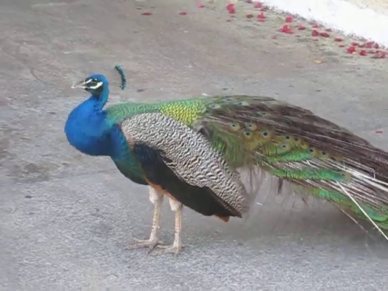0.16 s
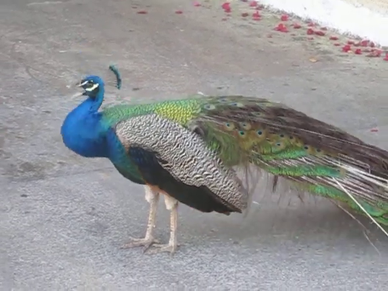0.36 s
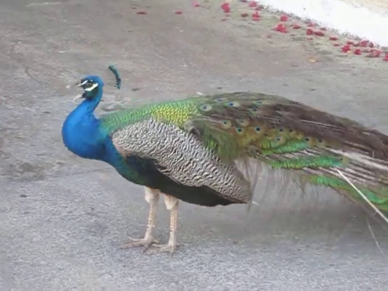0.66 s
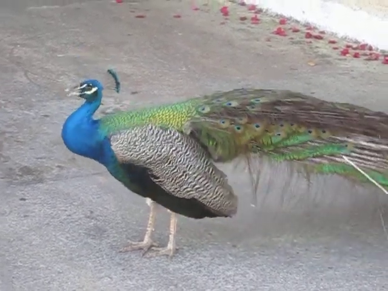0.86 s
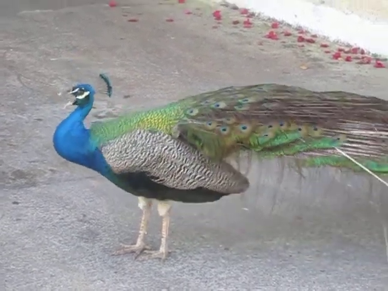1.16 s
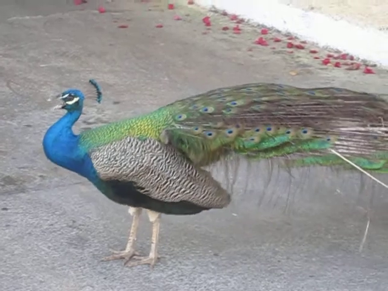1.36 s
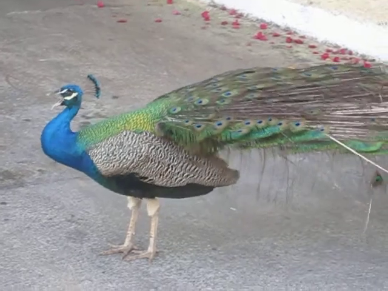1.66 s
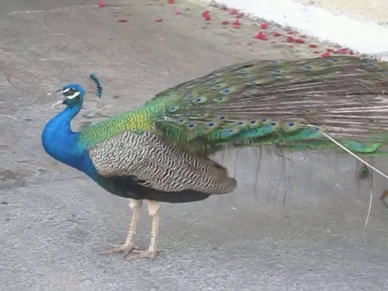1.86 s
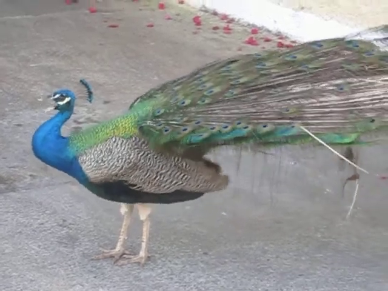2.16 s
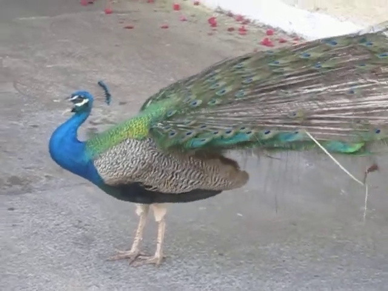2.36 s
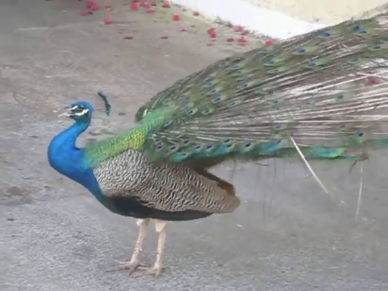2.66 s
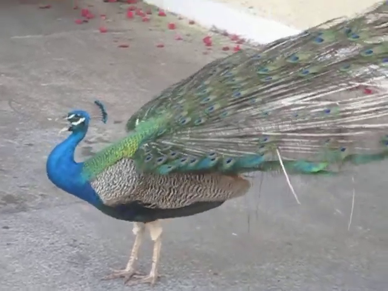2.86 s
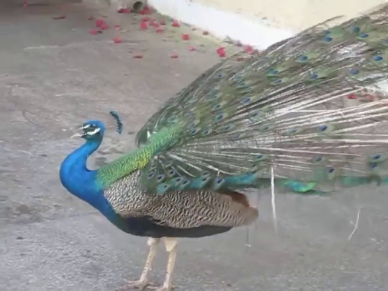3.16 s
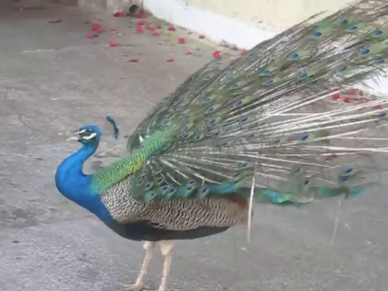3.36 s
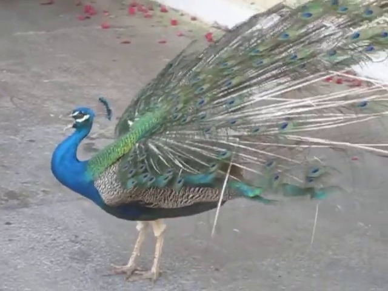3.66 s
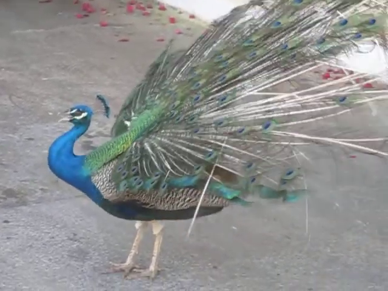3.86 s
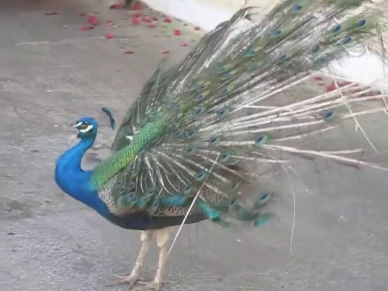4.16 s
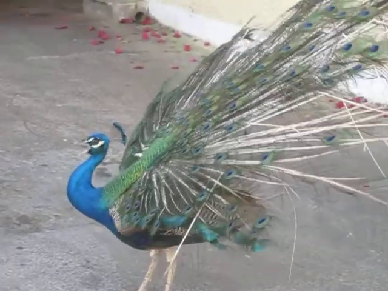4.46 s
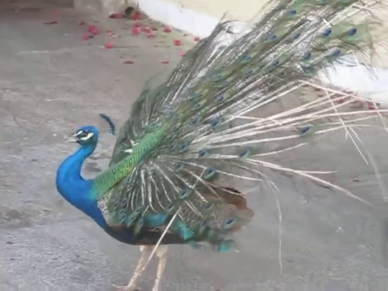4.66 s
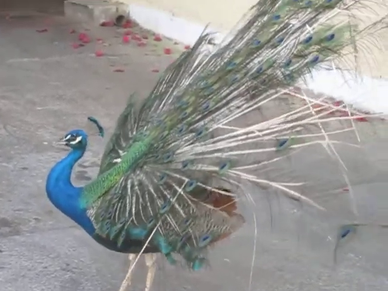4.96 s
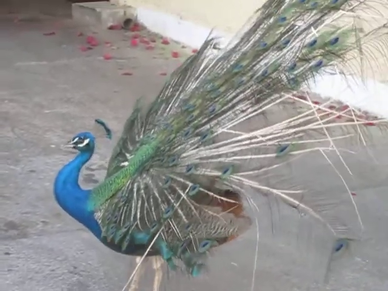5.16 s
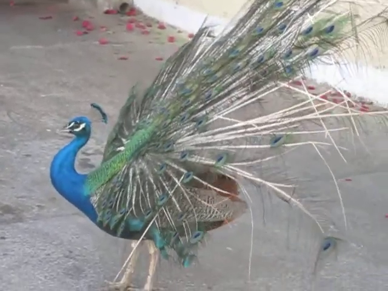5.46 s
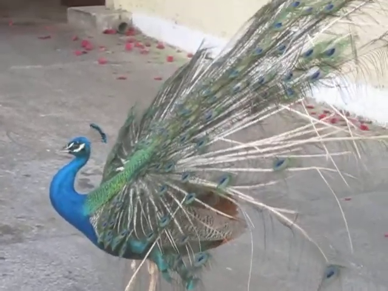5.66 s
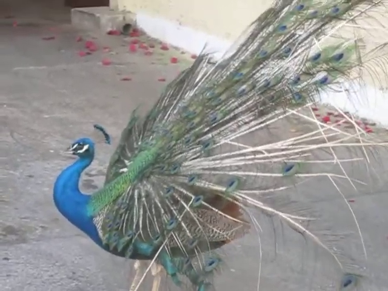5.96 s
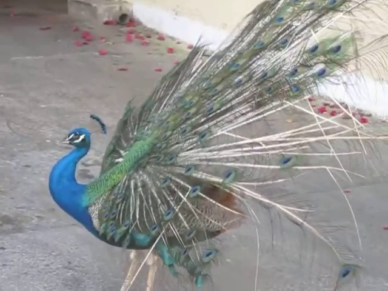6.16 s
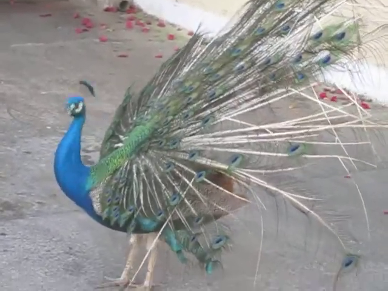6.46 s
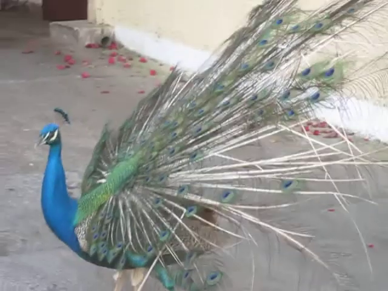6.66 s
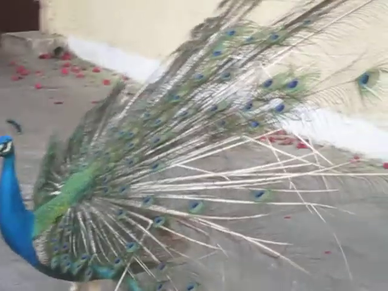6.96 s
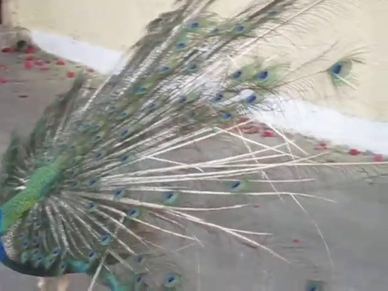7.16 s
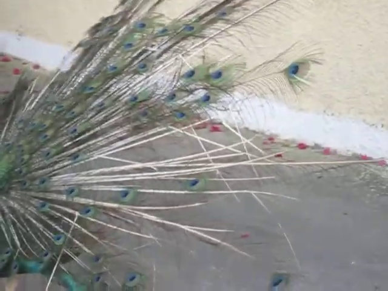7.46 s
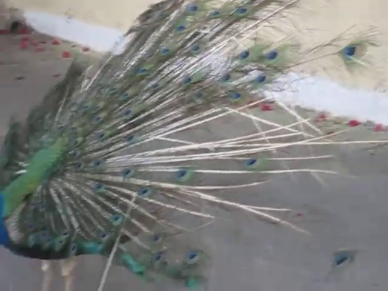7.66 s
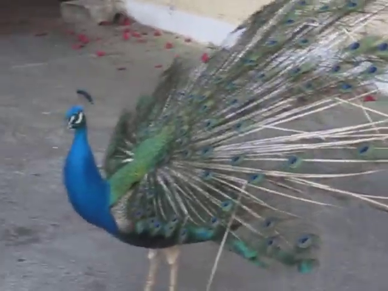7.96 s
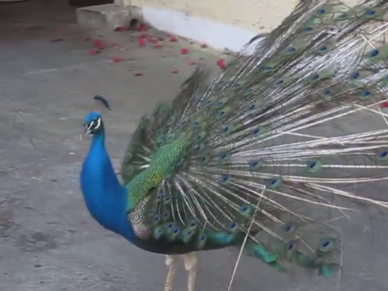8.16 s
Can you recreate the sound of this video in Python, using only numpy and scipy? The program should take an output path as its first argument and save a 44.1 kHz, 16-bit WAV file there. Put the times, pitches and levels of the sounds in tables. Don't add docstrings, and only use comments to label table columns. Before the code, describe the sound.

Seven loud peafowl calls ring off yard walls over faint traffic and hum, followed by quiet claws on paving, breeze and a distant peafowl's reply.

```python
import sys
import numpy as np
from scipy import signal
from scipy.fft import rfft, irfft, next_fast_len
from scipy.io import wavfile
from scipy.ndimage import uniform_filter1d, map_coordinates

SR = 44100
rng = np.random.default_rng(int(sys.argv[2]) if len(sys.argv) > 2 else 0)


def gain_from_db(level_db):
    decades = np.asarray(level_db, float) / 20
    return 10 ** decades


def put_to_file(sound):
    columns = np.atleast_2d(sound).T
    safe = np.clip(columns, -1, 1)
    whole_steps = np.round(safe * 32767)
    wavfile.write(sys.argv[1], SR, whole_steps.astype(np.int16))


N = 365883

# [t/s, length/s, top f/Hz, rise/s, low f/Hz]
CALLS = [
    (0.309, 0.49, 842, 0.25, 678.6),
    (1.009, 0.34, 814, 0.17, 668.6),
    (1.546, 0.33, 800, 0.16, 659),
    (2.098, 0.39, 790.5, 0.18, 654),
    (2.706, 0.398, 782.1, 0.193, 648.2),
    (3.36, 0.43, 778.6, 0.2, 640.5),
    (4.079, 0.47, 773.5, 0.21, 637.6),
]
# [t/s, length/s, top f/Hz, rise/s, low f/Hz]
CLUCK_ARC = (0.019, 0.0124, 775, 0.0034, 700)
# [f/Hz, level/dB]
THROAT_RESONANCE = [(500, -21.5), (800, 5.5), (1500, -2), (2100, 7.5), (2900, 8.5), (3700, 0.5),
                    (4400, -9.5), (5900, -7), (7000, -7), (8500, -22), (11500, -14.5), (13200, -23.5),
                    (15500, -40)]
# [f/Hz, width/Hz, level/dB]
PAVING_DIPS = [(1374, 15, -19), (1518, 19, -11), (2090, 20, -27)]
# [f/Hz, t60/s]
YARD_DECAY = [(500, 1.2), (1400, 0.88), (2000, 0.96), (2330, 1), (2800, 0.86), (5000, 0.64), (10000, 0.62),
              (15000, 0.63)]
# [f/Hz, level/dB]
YARD_TONE = [(400, 11), (800, -4.5), (1300, 1), (1600, 3), (2000, -5.5), (2350, 2.5), (3000, -2), (5000, 7),
             (6400, -1.5), (9000, 8.5), (12000, -5.5), (15000, -5.5)]
# [t/s, level/dB]
WALL_ARRIVALS = [(0, 2), (.008, 4), (.04, -9.5), (.065, 3), (.09, -0.5), (.13, -2), (.2, -3)]
# [t/s, length/s, f/Hz, level/dB, second partial level/dB]
FAR_PEAFOWL = [
    (7.72, 0.12, 845, -48.5, 1.5),
    (7.71, 0.17, 790, -51, -4),
    (7.955, 0.091, 940, -45, -11),
    (8.095, 0.27, 800, -47, -8.5),
    (8.18, .15, 925, -45, -10.5),
]
# [t/s, length/s, from f/Hz, to f/Hz, level/dB]
SMALL_BIRDS = [(.0, 0.028, 4850, 4330, -55), (.14, 0.13, 3500, 2960, -59.5), (5.73, .06, 3500, 3150, -61),
               (5.95, 0.049, 3550, 3110, -57), (6.14, 0.055, 3590, 3150, -55),
               (6.33, 0.056, 3600, 3350, -63), (7.02, 0.067, 1760, 1750, -61),
               (7.11, 0.054, 2110, 2060, -55.5), (6.47, 0.043, 2380, 2200, -59),
               (6.801, 0.12, 3370, 3100, -67), (7.217, 0.072, 1790, 1750, -60),
               (7.224, 0.065, 591, 575, -49), (7.375, 0.051, 4160, 4120, -59),
               (7.47, 0.074, 4120, 4120, -73), (7.85, 0.033, 5200, 4900, -64), (8.04, .04, 4900, 4700, -68),
               (8.15, 0.035, 2680, 3620, -67), (8.21, 0.039, 5130, 4640, -59)]
# [t/s, peak level/dB, low ring level/dB, crack
# level/dB]
CLAW_TICKS = [
    (0.0257, -47, -4, 6.5),
    (5.0436, -25.5, -5, -24),
    (5.3991, -49, 11, -10),
    (6.5671, -40, -10, -14),
    (6.5846, -23.5, -0.5, -18.5),
    (6.6649, -25, -0.5, -23),
    (7.4094, -51, -9, -5),
    (7.785, -50, -4, -9),
    (7.8545, -49, -4, -15),
]
# [t/s, peak level/dB, f/Hz]
WIND_PUSHES = [
    (7.125, -34, 99.6),
    (7.174, -34, 59.2),
    (7.215, -30.5, 116),
    (7.327, -30, 118),
    (7.359, -29, 113),
    (7.429, -32, 160),
    (7.584, -32, 75.4),
    (7.639, -31, 86.1),
    (7.899, -35, 61.3),
    (8.28, -40, 50),
]
# [f/Hz, level/dB per Hz]
WIND_RUMBLE = [(12, -52), (20, -7), (54, 1), (118, -7), (157, -14), (234, -12), (260, -26), (340, -49),
               (570, -120)]
# [f/Hz, level/dB]
MACHINE_HUM = [(59.2, -61.5), (349.9, -56), (527.6, -54.5), (1061, -62.5)]
# [f/Hz, level/dB per Hz]
FAR_AIR = [(15, -52), (25, -20), (59, -12), (309, -10.5), (344, -10), (488, -9.5), (529, -12), (729, -12.5),
           (1090, -15.5), (1540, -20), (3260, -25.5), (4260, -29), (7890, -33), (15000, -42.5)]

# [effort level/dB, brightness/dB per octave, first partial level/dB, second partial level/dB, beak ring level/dB]
CALL_VOICE, CLUCK_VOICE = (1.56, 2.48, 1.51, 0.55, 3.5), (-0.5, -11, 3.5, 6.5, -24)
LONGER, USUAL_S = (-11, 4, 20, 21, -2), 0.4
AT_OPENING, OPENING_S = (-5.5, -6.5, -6.5, 8.5, -2), 0.031
AT_CREST, CREST_SHARE = (2.5, 0, -1.5, -10, 1.5), 0.082
AT_CLOSING, SHUT_S = (-6, 0, -2.5, 8, -4.5), 0.032
CLOSING_S = 0.014
TOP_HZ = 15800


def peafowl():
    calls = [(CLUCK_ARC, CLUCK_VOICE, -19)]
    for row in CALLS:
        calls.append((row, CALL_VOICE + np.multiply(LONGER, row[1] - USUAL_S), -9))
    out = np.zeros(N)
    for row, voice, rasp_db in calls:
        start, direct, radiated = call(row, voice, rasp_db)
        add(out, start, gain_from_db(-1.87) * direct)
        add(out, start, yard(radiated, wet_db=-4.0, longer=1.066))
    return out


def call(row, voice, rasp_db):
    s, length, top_hz, rise_s, _ = row
    t = np.arange(round((length + CLOSING_S) * SR)) / SR
    k = np.arange(1, 25)[:, None]
    done = t / t[-1]
    crest = np.exp(-((t - rise_s) / (CREST_SHARE * length)) ** 2)
    voice_now = np.outer(voice, np.ones(len(t))) + np.outer(AT_CREST, crest)
    voice_now += np.outer(AT_OPENING, np.exp(-t / OPENING_S))
    voice_now += np.outer(AT_CLOSING, np.exp((t - t[-1]) / SHUT_S))
    extra_db, tilt_db, first_db, second_db, beak_db = voice_now

    shaky = 0.00061 + 0.017 * np.exp(-t / 0.016)
    hz = k * arc(t, *row[1:]) * (1 + shaky * wobble(249, len(t)))
    turn = np.exp(2j * np.pi * np.cumsum(hz, axis=1) / SR + 0.35j * k ** 2)

    third_db = 5.5 * crest + 3 * np.exp(-t / 0.042)
    level_db = along(THROAT_RESONANCE, hz) + tilt_db * np.log2(hz / 1400)
    level_db += first_db * (k == 1) + second_db * (k == 2) + third_db * (k == 3)
    level_db += beak_db * np.exp(-((hz - 3050) / 450) ** 2) - 200 * (hz > TOP_HZ)
    level_db -= 11 * done ** 1.62 * np.exp(-((hz - 6000) / 2700) ** 2)
    level_db -= 10 * (1 - np.sin(np.pi * done ** 0.93)) / (1 + (10500 / hz) ** 6)
    level = gain_from_db(level_db) / np.linalg.norm(gain_from_db(level_db), axis=0)

    spacing_hz = 1188.2 - 0.0206 * hz - 25.1 * crest + 0.2 * (top_hz - 800)
    path = 1 - 0.95 * np.exp(-hz / 40000) * np.exp(-2j * np.pi * hz / spacing_hz)
    dips_db = sum(db * np.exp(-((hz - dip_hz) / width) ** 2) for dip_hz, width, db in PAVING_DIPS)
    turning_db = 3.64 * (k > 4) * np.array([wobble(15.5, len(t)) for _ in k])
    head_up_db = 16 * crest * np.exp(-((hz - 3100) / 440) ** 2)
    path = path * gain_from_db(dips_db) * gain_from_db(turning_db - head_up_db)

    breath = gain_from_db(rasp_db - 60 * t / 0.096) + gain_from_db(rasp_db - 27)
    rasp = breath * noise(THROAT_RESONANCE)[:len(t)]
    effort_db = -3 - 9 * np.exp(-t / 0.052) + 4 * np.exp(-t / 0.0097) + extra_db
    gain = np.sqrt(2) * gain_from_db(effort_db) * fades(t, 0.0055, 0.026)
    direct = gain * (np.imag(level * path * turn).sum(0) + rasp)
    radiated = gain * (np.imag(level * turn).sum(0) + rasp)
    return round(s * SR), direct, radiated


def arc(t, length, top_hz, rise_s, low_hz):
    depth = top_hz - low_hz
    falls_s = rise_s + 0.106 * length
    bend = 2.745 * (120.13 / depth) ** 1.37
    climb = np.clip(1 - t / rise_s, 0, 1) ** bend
    fall = np.clip((t - falls_s) / (length - falls_s), 0, 1.2) ** 1.14
    scoop = 61 * np.exp(-t / 0.0061)
    sag = 43.45 * np.exp(np.minimum(t - length, 0.007) / 0.00956)
    pitch = top_hz - depth * climb - (depth - 19.4) * fall - scoop - sag
    return uniform_filter1d(pitch, size=441, mode="nearest")


def yard(x, wet_db, longer):
    hz, t, z = signal.stft(rng.standard_normal(round(1.6 * SR)), SR, nperseg=256)
    fade_db = along(YARD_TONE, hz)[:, None] - 60 * t / (longer * along(YARD_DECAY, hz)[:, None])
    walls_db = np.interp(t, *np.transpose(WALL_ARRIVALS))
    tail = signal.istft(z * gain_from_db(fade_db + walls_db), SR, nperseg=256)[1]
    return gain_from_db(wet_db) * signal.fftconvolve(x, tail / np.linalg.norm(tail))


def claws():
    out, t = np.zeros(N), np.arange(SR // 10) / SR
    for s, db, low_db, crack_db in CLAW_TICKS:
        pair = np.sin(2 * np.pi * 3880 * t) + gain_from_db(low_db) * np.sin(2 * np.pi * 2850 * t)
        ring = gain_from_db(-60 * t / 0.007) * (1 - np.exp(-t / 0.00027)) * pair
        grit = uniform_filter1d(np.diff(rng.standard_normal(len(t) + 1)), size=2)
        crack_and_scuff = gain_from_db(-60 * t / 0.0078) + gain_from_db(-11 - 60 * t / 0.14)
        scuff = 1.5 * grit * gain_from_db(crack_db) * crack_and_scuff
        add(out, round((s - 0.0006) * SR), gain_from_db(db + 7.0) * (ring + scuff))
    return out + yard(out, wet_db=-14.0, longer=0.15)[:N]


def neighbours():
    out = far_peafowl() + small_birds()
    return out + yard(out, wet_db=-1.5, longer=0.98)[:N]


def far_peafowl():
    out = np.zeros(N)
    for s, length, held_hz, start_db, second_db in FAR_PEAFOWL:
        t = np.arange(round(length * SR)) / SR
        pitch = held_hz * (1 - 0.172 * np.exp(-t / 0.0166))
        phase = 2 * np.pi * np.cumsum(pitch * (1 + 0.0195 * wobble(75.3, len(t)))) / SR
        third_db = -15 - 12 * (held_hz > 820)
        tone = np.sin(phase) + gain_from_db(second_db - 0.5) * np.sin(2 * phase) + gain_from_db(third_db) * np.sin(3 * phase)
        level_db = start_db - 24 * t + 7.0 + 1.6 * wobble(32.0, len(t))
        add(out, round(s * SR), gain_from_db(level_db) * fades(t, 0.013, 0.023) * tone)
    return out


def small_birds():
    out = np.zeros(N)
    for s, length, from_hz, to_hz, db in SMALL_BIRDS:
        u = np.linspace(0, 1, round(length * SR))
        glide = to_hz + (from_hz - to_hz) * (1 - u) ** 1.74
        whistle = np.sin(2 * np.pi * np.cumsum(glide) / SR)
        add(out, round(s * SR), gain_from_db(db + 4.0) * np.sin(np.pi * u) * whistle)
    return out


def buffets():
    out, t = np.zeros(N), np.arange(SR // 8) / SR
    for s, db, hz in WIND_PUSHES:
        push = (t / 0.0096) * np.exp(-t / 0.006)
        add(out, round(s * SR), gain_from_db(db + 6.5) * push * np.sin(2 * np.pi * hz * t))
    return out


def breeze():
    t = np.arange(N) / SR
    gust = gain_from_db(-60) * (t > 6.7)
    for s, db, _ in WIND_PUSHES:
        gust = gust + gain_from_db(db - 17) * np.exp(-((t - s) / 0.029) ** 2)
    return gust * unit(gain_from_db(4.5 * wobble(22, N)) * noise(WIND_RUMBLE))


def machine():
    t, out = np.arange(N) / SR, np.zeros(N)
    for hz, db in MACHINE_HUM:
        level = gain_from_db(db + 3.5 + 1.2 * wobble(9, N))
        out += level * np.sin(2 * np.pi * hz * t + 0.86 * wobble(11, N))
    return out


def far_air():
    return gain_from_db(-47 + 0.4 * wobble(2.5, N) + 1.1 * wobble(12, N)) * noise(FAR_AIR)


def unit(x):
    return x / np.sqrt(np.mean(x ** 2) + 1e-20)


def along(points, hz):
    f, v = np.transpose(points)
    return np.interp(np.log(hz + 1), np.log(f + 1), v)


def wobble(rate, count):
    knots = rng.standard_normal(int(count * rate / SR) + 4)
    return map_coordinates(knots, [np.arange(count) * rate / SR])


def noise(spectrum):
    m = next_fast_len(N)
    colour = gain_from_db(along(spectrum, np.fft.rfftfreq(m, 1 / SR)))
    return unit(irfft(rfft(rng.standard_normal(m)) * colour, m)[:N])


def fades(t, in_s, out_s):
    return np.clip(t / in_s, 0, 1) * np.clip((t[-1] - t) / out_s, 0, 1)


def add(track, start, x):
    track[start:start + len(x)] += x[:len(track) - start]


def scene():
    mono = peafowl() + claws() + neighbours() + buffets() + breeze() + machine() + far_air()
    return np.tile(mono, (2, 1))


def gain_control(x, top_db, grip, attack_s, release_db):
    step = 32
    power = signal.lfilter([0.004], [1, 0.004 - 1], x ** 2)[::step]
    wanted = np.minimum(0, grip * (top_db - 10 * np.log10(power + 1e-12)))
    gain = np.zeros(len(wanted))
    fall = 1 - np.exp(-step / SR / attack_s)
    rise = release_db * step / SR
    for i in range(1, len(gain)):
        gap = wanted[i] - gain[i - 1]
        gain[i] = gain[i - 1] + (fall * gap if gap < 0 else min(gap, rise))
    return gain_from_db(np.interp(np.arange(len(x)), np.arange(len(gain)) * step, gain))


def top_cut(x):
    return signal.sosfilt(signal.butter(12, 16310, fs=SR, output="sos"), x)


def record(dry):
    x = dry * gain_control(dry[0], top_db=-19.5, grip=1.0, attack_s=0.015, release_db=167.0)
    x = x + 0.12 * x ** 2 - 0.08 * x ** 3
    x = signal.sosfilt(signal.butter(2, 20, "high", fs=SR, output="sos"), x)
    x = signal.sosfilt(signal.ellip(8, 0.1, 60, TOP_HZ, fs=SR, output="sos"), x)
    return top_cut(x)


dry = scene()
out = record(dry)
put_to_file(out)
```